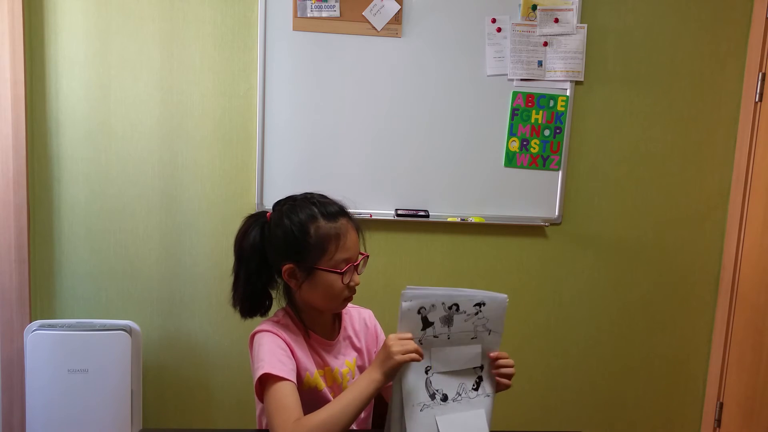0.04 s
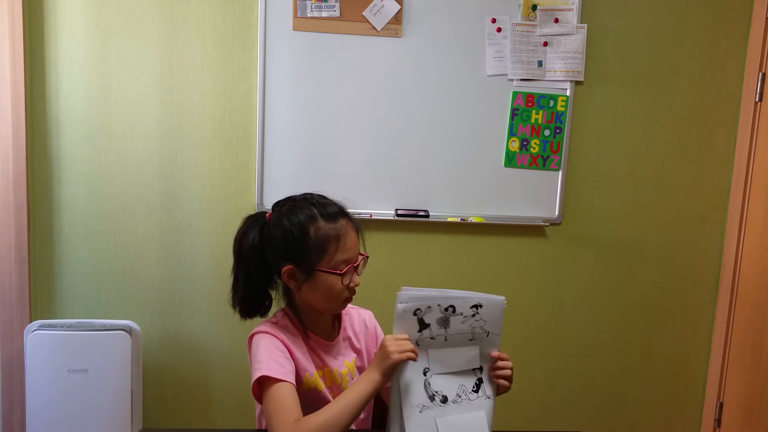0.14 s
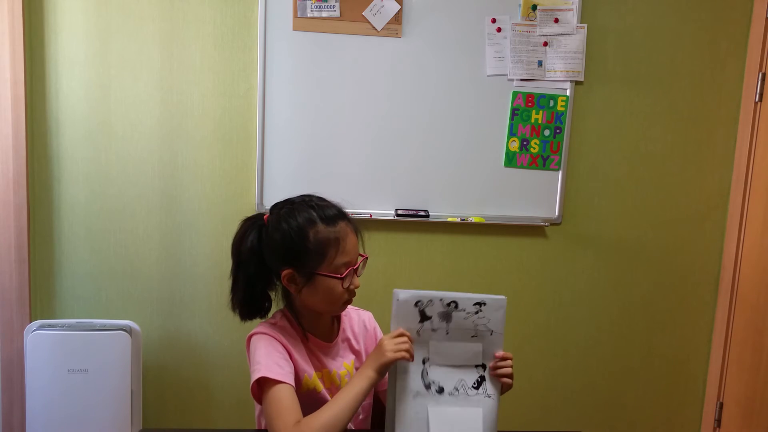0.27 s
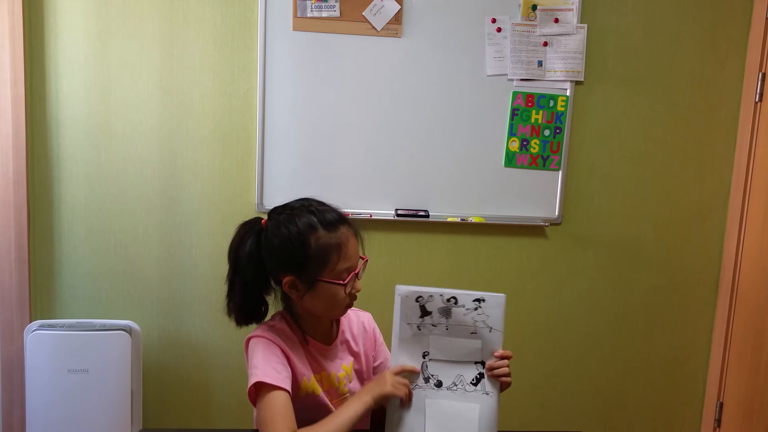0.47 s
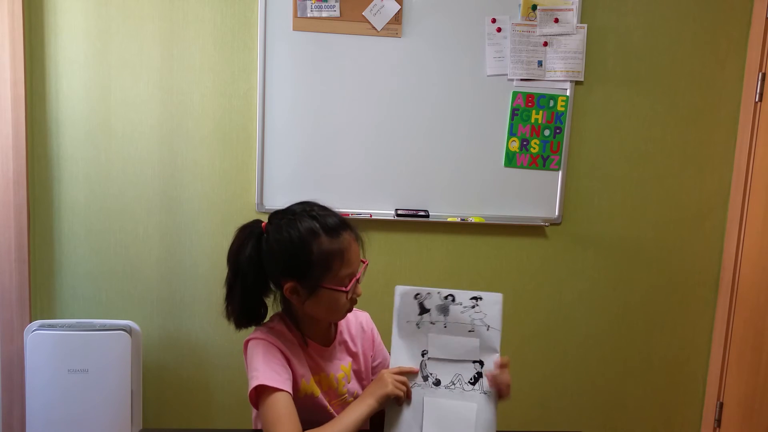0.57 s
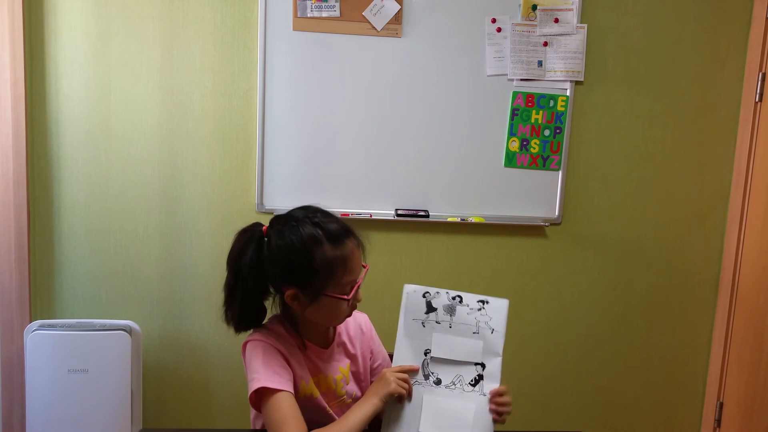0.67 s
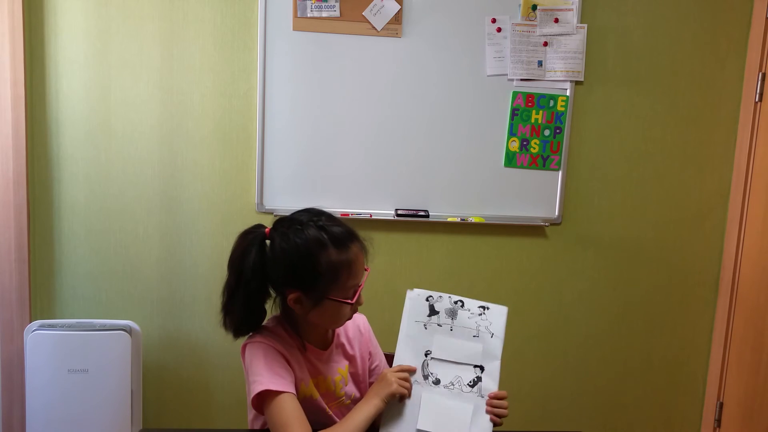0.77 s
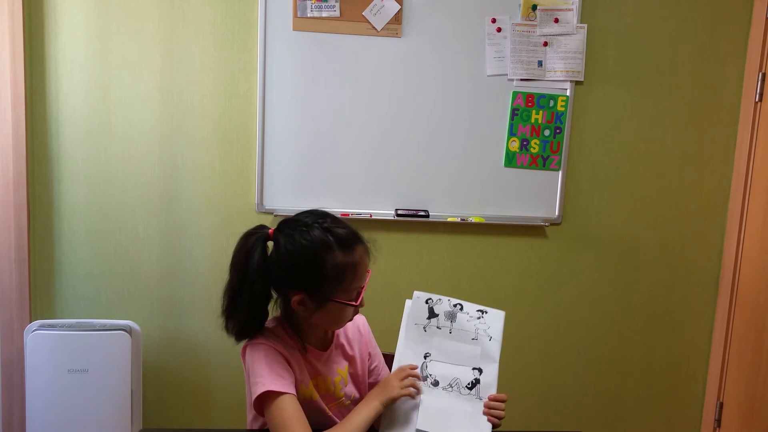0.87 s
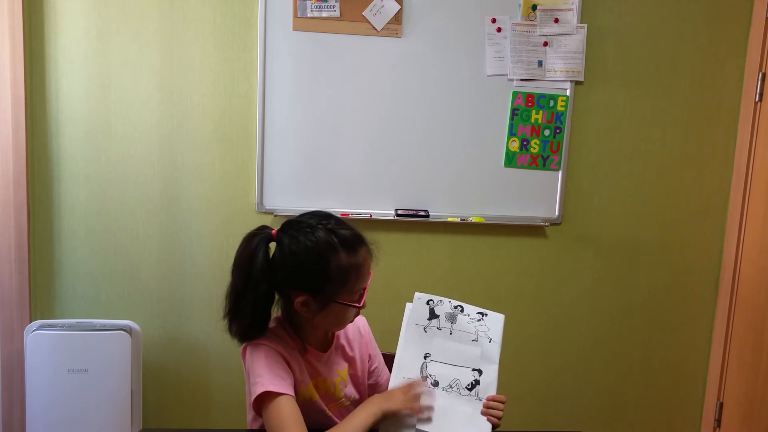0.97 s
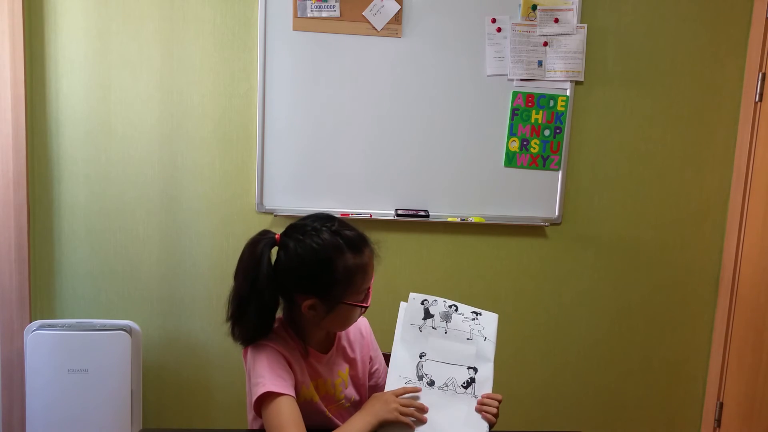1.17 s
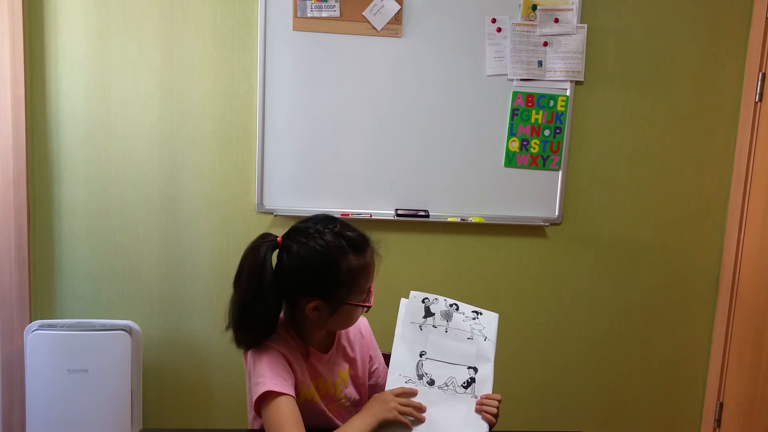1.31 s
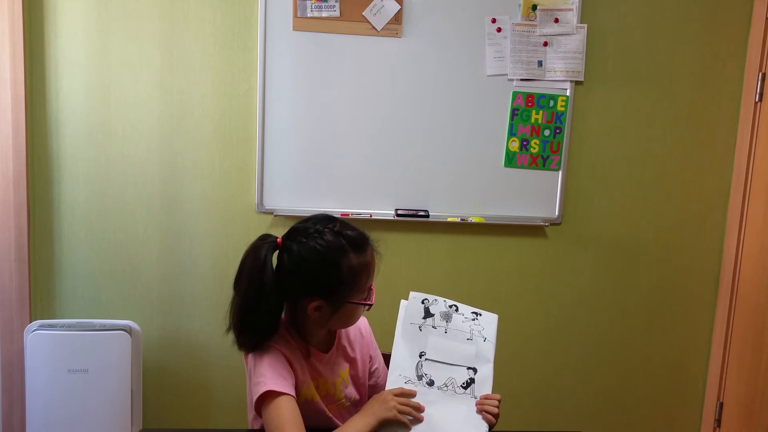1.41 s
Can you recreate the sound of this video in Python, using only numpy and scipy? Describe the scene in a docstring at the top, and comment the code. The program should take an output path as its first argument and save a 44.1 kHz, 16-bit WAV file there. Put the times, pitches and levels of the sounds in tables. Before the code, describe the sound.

Paper sheets are handled on a desk: a faint rustle, then a strong boomy thud, a run of smaller knocks with rubbing and crisp crackles, fading to light scuffs, in a small room, close stereo microphone.

```python
"""A soft bump and a faint rustle, then louder thuds: paper sheets are shuffled on a desk in a small room.
Decaying sine modes make the desk's boom, mostly on the left; shaped noise makes the knocks.
Grainy noise under movement envelopes makes the paper rub, hiss, scrape and scuff.
Short noise bursts are buckling sheets; a narrow treble resonance of the microphone port rings with them.
Steady coloured noise is the room tone."""
import sys
import numpy as np
from scipy import signal
from scipy.fft import rfft, irfft, next_fast_len
from scipy.io import wavfile

SR = 44100
rng = np.random.default_rng(int(sys.argv[2]) if len(sys.argv) > 2 else 0)


def materialize(psi):
    """Save the field psi as 16-bit PCM at rate SR to the path in sys.argv[1].

    A 1-D psi becomes a single channel; in a 2-D psi each row is a channel.
    """
    bounded = np.clip(np.atleast_2d(psi).T, -1, 1)
    quanta = np.round(bounded * 32767).astype(np.int16)
    wavfile.write(sys.argv[1], SR, quanta)


N = 63945  # samples


def amp(db):
    """Level law: amplitude ratio from decibels."""
    return 10 ** (np.asarray(db) / 20)


def unit(x):
    """Normalisation to an rms of 1."""
    return x / np.sqrt(np.mean(x ** 2) + 1e-20)


def along(points, hz):
    """Interpolation of (f/Hz, value) points on a logarithmic frequency axis."""
    f, value = np.transpose(points)
    return np.interp(np.log(hz + 1), np.log(f + 1), value)


def since(start):
    """Elapsed time in seconds since the start, zero before it."""
    return np.maximum(np.arange(N) / SR - start, 0)


def filtered(x, response):
    """Linear filtering: the spectrum times a response of frequency."""
    size = next_fast_len(N + SR // 2)
    spectrum = rfft(x, size) * response(np.fft.rfftfreq(size, 1 / SR))
    return irfft(spectrum, size)[..., :N]


def coloured(x, spectrum):
    """Spectral shaping by (f/Hz, level/dB) points, at rms 1."""
    return unit(filtered(x, lambda hz: amp(along(spectrum, hz))))


def ringing(x, modes):
    """Resonance: a sum of second-order bands of alternating sign, at rms 1."""
    def response(f):
        total = 0
        for k, (centre, width, db) in enumerate(modes):
            band = 1j * f * width / (centre ** 2 - f ** 2 + 1j * f * width)
            total = total + (-1) ** k * amp(db) * band
        return total
    return unit(filtered(x, response))


ALIKE = 0.29  # share of noise power common to both sides


def noise():
    """Partial coherence: white noise, partly shared by both sides."""
    common = rng.standard_normal(N)
    separate = rng.standard_normal((2, N))
    return np.sqrt(ALIKE) * common + np.sqrt(1 - ALIKE) * separate


# Stereo levels below apply before the right microphone's own response.
def pan(db):
    """Level difference: this gain on the left, its inverse on the right."""
    return amp([[db], [-db]])


def left_heavy(right_db):
    """Level difference: full level on the left, the given level on the right."""
    return amp([[0], [right_db]])


RELEASE_S = 0.014  # time constant


def strokes(rows):
    """Envelope superposition: each movement rises linearly, holds and decays exponentially."""
    total = np.zeros(N)
    for start, length, rise, db in rows:
        onset = np.minimum(since(start) / max(rise, 1e-3), 1)
        release = np.exp(-since(start + length) / RELEASE_S)
        total += amp(db) * onset * release
    return total


GRAINS_PER_S, GRAIN_SPREAD_DB = 2500, 3.5
GRAIN_SHARE = 0.39  # share of power in the slips, before colouring


def friction(spectrum):
    """Stick-slip friction: tiny slips of uneven size on a bed of noise."""
    happens = rng.random(N) < GRAINS_PER_S / SR
    size = amp(GRAIN_SPREAD_DB * np.minimum(rng.exponential(size=N), 4))
    slips = unit(happens * size * np.sign(rng.standard_normal(N)))
    bed = rng.standard_normal((2, N))
    return coloured(np.sqrt(GRAIN_SHARE) * slips + np.sqrt(1 - GRAIN_SHARE) * bed, spectrum)


# Decay of the room: f/Hz, t60/s
ROOM_DECAY = [(150, .4), (1000, 0.41), (5000, 0.28), (14000, 0.37)]


def room(x, wet_db):
    """Reverberation: convolution with noise whose decay time depends on frequency."""
    hz, t, cells = signal.stft(rng.standard_normal((2, SR // 2)), SR, nperseg=256)
    decay = amp(-60 * t / along(ROOM_DECAY, hz)[:, None])
    tail = signal.istft(cells * decay, SR, nperseg=256)[1]
    wet = signal.fftconvolve(x, tail / np.linalg.norm(tail[0]), axes=1)[:, :N]
    return (x + amp(wet_db) * wet) / np.hypot(1, amp(wet_db))


# Bumps on the desk: t/s, boom level/dB, swell/s, upper modes level/dB, knock level/dB, knock rise/s
BUMPS_ON_DESK = [(0.002, -32.5, 0.0027, -15, -40.5, 0.0017), (0.058, -34.5, 0.044, -23, -57, 0.026),
                 (0.2104, -3.5, .014, 1, -19.5, 0.0028), (0.302, -12.5, 0.017, 7, -25.5, 0.01),
                 (0.382, -9.5, 0.016, -10.5, -31.5, 0.0135), (0.518, -16.5, 0.045, 5.5, -34, 0.025),
                 (0.5676, -13.5, 0.014, 10, -28, 0.018), (0.6178, -11, 0.0069, -30, -36, 0.0066),
                 (0.695, -17, 0.013, 9, -29.5, 0.01), (0.79, -19.5, 0.026, -1, -35, .01),
                 (0.904, -19, 0.024, -6.5, -47, 0.018), (1.097, -22.5, 0.026, -16, -52, 0.022),
                 (1.214, -31.5, 0.012, -8, -65, .02), (1.322, -32.5, 0.0081, -19, -89.5, 0.0095)]
# Modes of the desk: f/Hz, relative level/dB, t60/s
DESK_MODES = [(89.1, -7.5, 0.59), (123.02, 4, 0.44), (188.3, -14, 0.292), (210, -21.5, 0.47),
              (268.7, -15.5, 0.42), (286.7, -16.5, 0.19), (322, -28.5, 0.2), (446.4, -27.5, 0.31),
              (507.3, -31, 0.19), (606, -32.5, .25), (684.5, -43, 0.55), (794, -45, 0.27),
              (880, -37.5, 0.27)]
# Colour of the knock: f/Hz, relative level per Hz/dB
KNOCK_COLOUR = [(60, -28.5), (160, 4.5), (330, -2.5), (400, -12.5), (620, -11), (1150, -32.5), (1800, -42),
                (3000, -65), (8000, -67)]
DAMP_S = 0.017  # a new contact stops the old ring
KNOCK_T60 = 0.3  # s
DESK_RIGHT_DB, KNOCK_RIGHT_DB = -25.5, -5.5


def desk():
    """Modal excitation: each bump knocks, swells the modes and damps what rang before."""
    boom, knock_envelope = np.zeros(N), np.zeros(N)
    ends = [row[0] for row in BUMPS_ON_DESK[1:]] + [N / SR]
    for (start, db, swell, upper_db, knock_db, knock_rise), end in zip(BUMPS_ON_DESK, ends):
        t = since(start)
        held = np.exp(-(since(end) / DAMP_S) ** 2)
        for k, (hz, mode_db, t60) in enumerate(DESK_MODES):
            # the two lowest modes swell; the upper ones rise with the knock
            rise, gain = (swell, 1) if k < 2 else (knock_rise, amp(upper_db))
            onset = 1 - np.exp(-(t / rise) ** 2)
            decay = amp(db + mode_db - 60 * t / t60)
            boom += gain * held * decay * onset * np.sin(2 * np.pi * hz * t)
        knock_onset = 1 - np.exp(-(t / knock_rise) ** 2)
        knock_envelope += held * knock_onset * amp(knock_db - 60 * t / KNOCK_T60)
    knocks = knock_envelope * coloured(noise(), KNOCK_COLOUR)
    return boom * left_heavy(DESK_RIGHT_DB) + knocks * left_heavy(KNOCK_RIGHT_DB)


# Soft shoves that rock the desk: t/s, level/dB
DESK_SHOVES = [(0.0, -28), (0.085, -39.5), (0.232, -27), (0.65, -17), (0.726, -28), (0.897, -17.5),
               (1.028, -30), (1.399, -35)]
ROCK_HZ, ROCK_SWELL_S, ROCK_RIGHT_DB = 55.2, 0.018, -39
ROCK_TAIL_DB, ROCK_T60 = -31, 1  # relative level of the room's hum; its t60 in s


def rocking():
    """Damped oscillation: a shove sways the desk for a few cycles, and the room hums on."""
    out = np.zeros((2, N))
    for start, db in DESK_SHOVES:
        t = since(start)
        u = t / ROCK_SWELL_S
        sway = (u * np.exp(1 - u)) ** 2 * left_heavy(ROCK_RIGHT_DB)
        hum = amp(ROCK_TAIL_DB - 60 * t / ROCK_T60) * (1 - np.exp(-u ** 2))
        out += amp(db) * (sway + hum) * np.sin(2 * np.pi * ROCK_HZ * t)
    return out


# Sheet rubbing on sheet and skin: f/Hz, relative level per Hz/dB
RUB_COLOUR = [(150, -43.5), (450, 2.5), (900, 5.5), (1040, 3.5), (1160, 3.5), (1330, -8.5), (1600, -1),
              (2200, -10.5), (3500, -15.5), (6000, -28.5), (14000, -35)]
# Drags of the stack's edge on the desk: t/s, length/s, rise/s, level/dB
EDGE_DRAGS = [(0.31, 0.024, 0.023, -46), (0.39, 0.051, 0.011, -47), (0.556, 0.0067, 0.011, -35),
              (0.58, 0.03, 0.0078, -43), (0.735, 0.083, 0.022, -45.5)]
# Resonances of the edge: f/Hz, width/Hz, relative level/dB
EDGE_MODES = [(895, 50, -6), (1160, 50, 0), (1260, 110, -3), (1520, 170, -2), (1820, 100, -6)]
EDGE_RIGHT_DB = -28


def edge():
    """Friction-driven resonance: the dragged edge of the stack chatters in a few bands."""
    return strokes(EDGE_DRAGS) * ringing(friction(RUB_COLOUR), EDGE_MODES) * left_heavy(EDGE_RIGHT_DB)


# Slides of paper: t/s, length/s, rise/s, rub level/dB, hiss level/dB
PAPER_SLIDES = [(0.0, .15, 0.0017, -53.5, -49.5), (0.207, 0.0081, .003, -39.5, -51.5),
                (0.265, 0.013, 0.022, -42, -54), (0.297, 0.043, 0.017, -40.5, -52),
                (0.358, 0.077, 0.02, -47, -43.5), (0.492, 0.043, 0.054, -51.5, -52.5),
                (0.547, 0.059, 0.013, -40, -55), (0.608, 0.076, 0.024, -51, -52.5),
                (0.684, .12, 0.033, -41.5, -46), (0.832, 0.099, .035, -47.5, -50),
                (1.087, 0.082, 0.0063, -51, -58), (1.198, 0.017, 0.0025, -53.5, -52.5),
                (1.337, 0.087, 0.045, -56.5, -63.5)]


def rubbing():
    """Sliding friction: the broad, lower part of the paper's sound."""
    rows = [(*move, rub_db) for *move, rub_db, _ in PAPER_SLIDES]
    return strokes(rows) * friction(RUB_COLOUR)


# Narrow treble resonances of the microphone port: f/Hz, width/Hz, relative level/dB
PORT_MODES = [(10090, 190, -2), (10530, 33, 4), (12020, 440, -9)]


def port_ringing():
    """Cavity resonance: noise ringing in the microphone port's narrow treble bands."""
    return ringing(noise(), PORT_MODES)


# Fibres catching: f/Hz, relative level per Hz/dB
HISS_COLOUR = [(300, -12), (1500, 4.5), (3000, 5.5), (5000, -1.5), (8000, 4), (11000, 2), (13000, -3.5),
               (14800, -7)]
PORT_IN_HISS_DB = -12


def hissing():
    """Stick-slip of fibres: treble grains, with the microphone port ringing more weakly."""
    rows = [(*move, hiss_db) for *move, _, hiss_db in PAPER_SLIDES]
    return strokes(rows) * (friction(HISS_COLOUR) + amp(PORT_IN_HISS_DB) * port_ringing())


# Fingers scraping over the page: t/s, length/s, rise/s, level/dB
FINGER_SCRAPES = [(1.086, .02, 0.0043, -44), (1.125, .04, 0.0076, -46), (1.412, .04, 0.0045, -55)]
# Colour of a scrape: f/Hz, relative level per Hz/dB
SCRAPE_COLOUR = [(400, 0), (900, -2.5), (1300, -3), (1600, 10.5), (2000, -1.5), (2900, -5), (4200, -13),
                 (6000, -27), (14000, -34)]


def scrapes():
    """Dry friction: fingers scrape over the page."""
    return strokes(FINGER_SCRAPES) * friction(SCRAPE_COLOUR)


# Dull scuffs of a hand: t/s, length/s, rise/s, level/dB
HAND_SCUFFS = [(1.127, 0.067, 0.019, -49), (1.369, .1, 0.0082, -43.5)]
# Colour of a scuff: f/Hz, relative level per Hz/dB
SCUFF_COLOUR = [(150, -28), (370, 5), (650, -1), (900, -17), (2500, -61)]


def scuffs():
    """Soft-contact friction: a hand scuffs with little treble."""
    return strokes(HAND_SCUFFS) * friction(SCUFF_COLOUR)


RUB_PAN_DB, HISS_PAN_DB = -1, -3.9
PAPER_WET_DB, SNAP_WET_DB = -4.5, 2  # reverberant level relative to the direct sound


def paper():
    """Superposition: the friction sounds share one reverberant room."""
    dull = (rubbing() + scuffs()) * pan(RUB_PAN_DB)
    return room(dull + scrapes() + hissing() * pan(HISS_PAN_DB), PAPER_WET_DB)


# Sheets buckling: t/s, crack level/dB, port ringing relative to the crack/dB
SHEET_SNAPS = [(0.0798, -45, 4), (0.1351, -52, 12), (0.3533, -24, 3), (0.3577, -36, -8.5), (0.36, -47, -5),
               (0.374, -51, 2.5), (0.4209, -28.5, -24), (0.428, -52, -8.5), (0.922, -34, -10),
               (0.928, -34, -16), (1.196, -38, -26)]
SNAP_T60 = 0.014  # s


def snaps():
    """Impulsive excitation: a buckling sheet gives a short crack; the microphone port rings with it."""
    out = np.zeros((2, N))
    for start, db, port_db in SHEET_SNAPS:
        t = since(start)
        envelope = (t > 0) * amp(db - 60 * t / SNAP_T60)
        out += envelope * (coloured(noise(), HISS_COLOUR) + amp(port_db) * port_ringing())
    return room(out * pan(HISS_PAN_DB), SNAP_WET_DB)


# Colour of the room tone: f/Hz, relative level per Hz/dB
FLOOR_COLOUR = [(20, 1.5), (52, 5), (80, -2), (125, 1), (165, -15), (300, -10), (700, -20.5), (1800, -28.5),
                (2700, -29.5), (3500, -37.5), (6000, -44.5), (12000, -36.5), (15000, -61)]
FLOOR_DB = -43


def room_tone():
    """Stationary noise: a steady, partly coherent background."""
    return amp(FLOOR_DB) * coloured(noise(), FLOOR_COLOUR)


def scene():
    """Linear superposition of desk, paper and room tone."""
    return desk() + rocking() + edge() + paper() + snaps() + room_tone()


# Response of the right microphone port: f/Hz, level/dB
RIGHT_PORT_COLOUR = [(3500, -6), (5200, 1.5), (6000, -14.5), (7000, -2.5), (8000, -17), (9300, -7.5),
                     (10500, -6.5), (11500, -4.5), (14500, -8.5)]
PORT_LAG_S = 0.00003  # the left port hears the sound slightly later
TOP_HZ = 14800


def record(dry):
    """Transfer function: the right port is coloured and leads; both sides share a band limit."""
    def right_response(hz):
        lead = np.exp(2j * np.pi * hz * PORT_LAG_S)
        return amp(along(RIGHT_PORT_COLOUR, hz)) * lead
    right = filtered(dry[1], right_response)
    return filtered(np.array([dry[0], right]), lambda hz: hz < TOP_HZ)


dry = scene()
out = record(dry)
materialize(out)
```